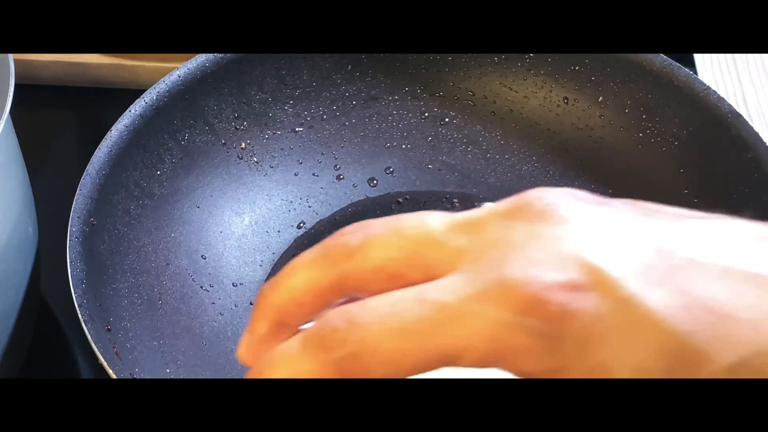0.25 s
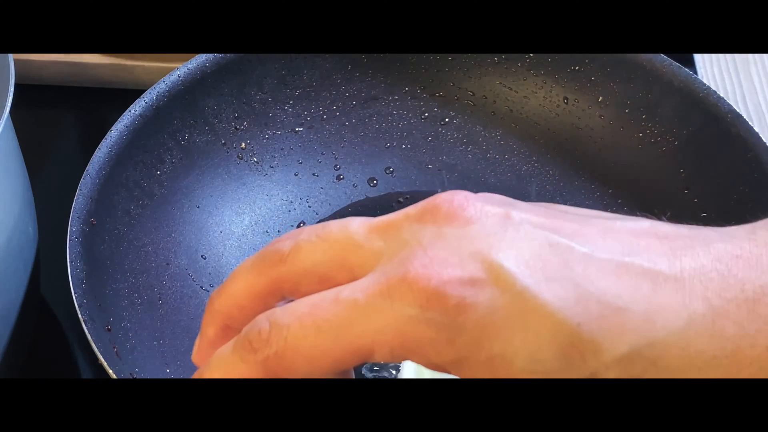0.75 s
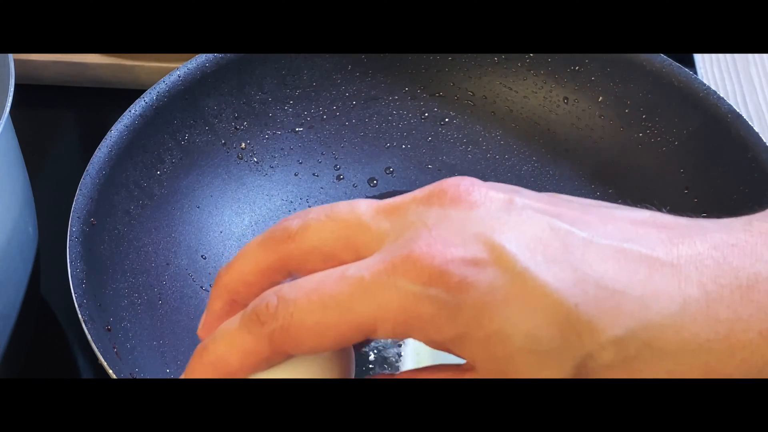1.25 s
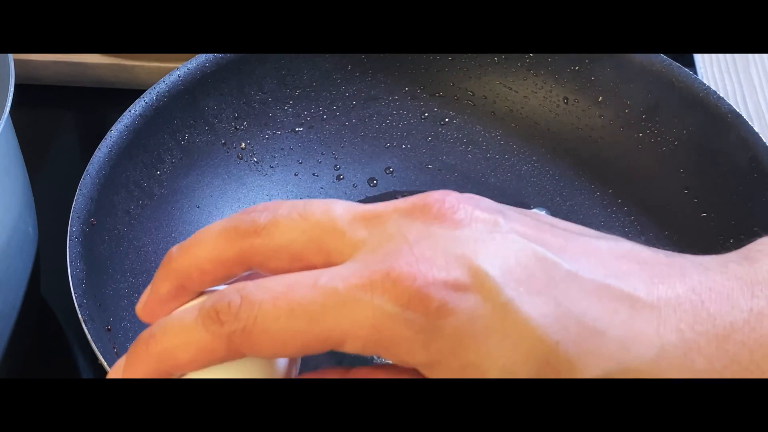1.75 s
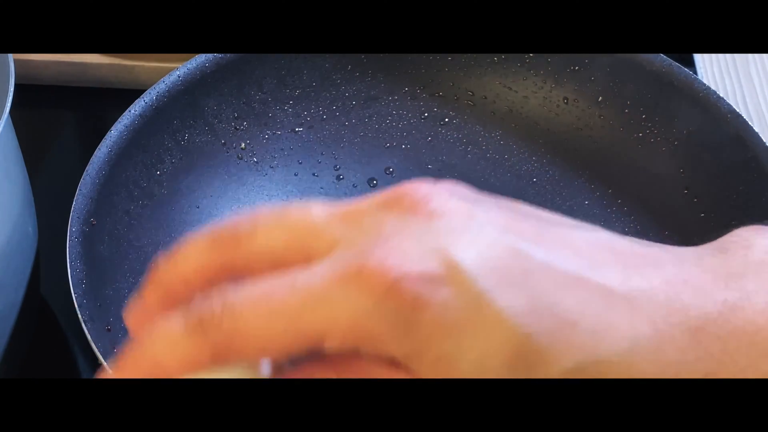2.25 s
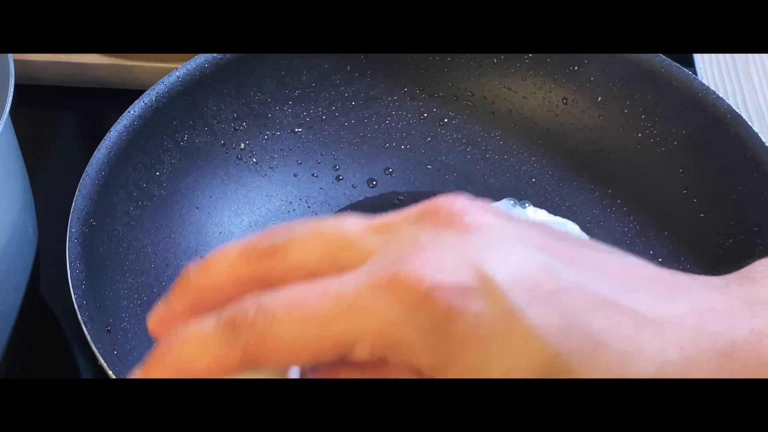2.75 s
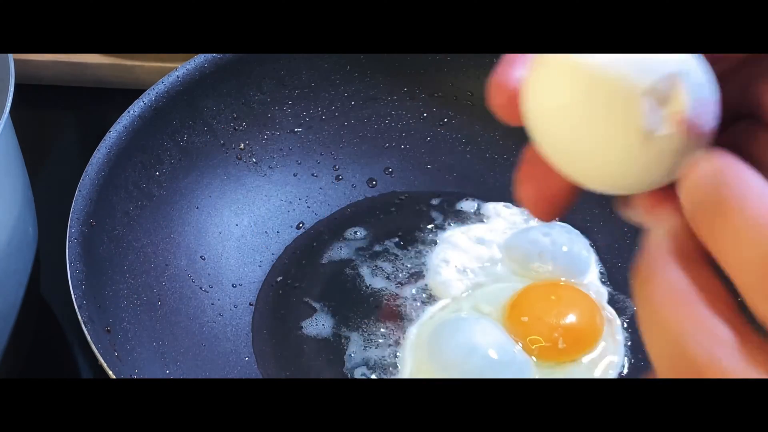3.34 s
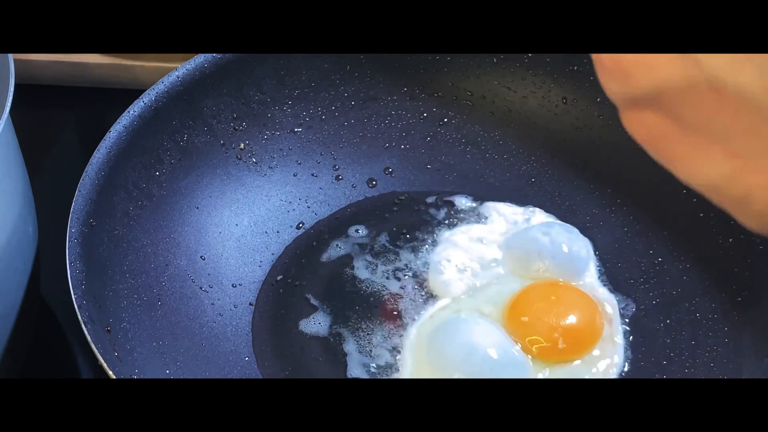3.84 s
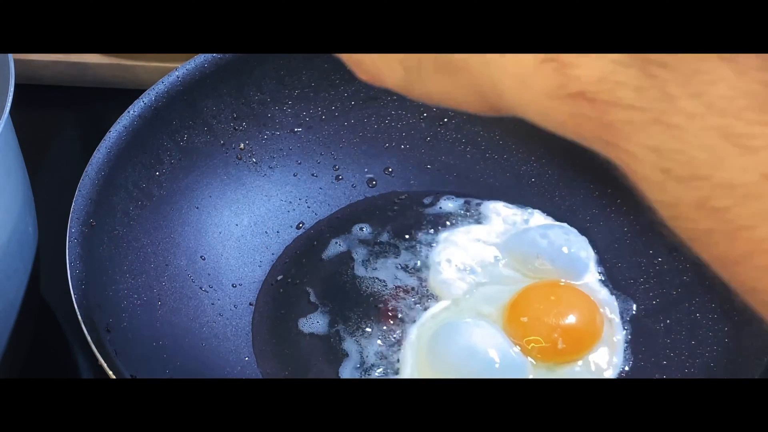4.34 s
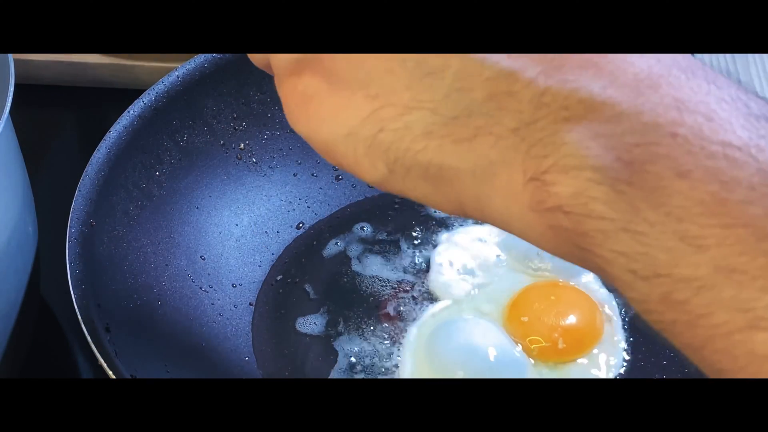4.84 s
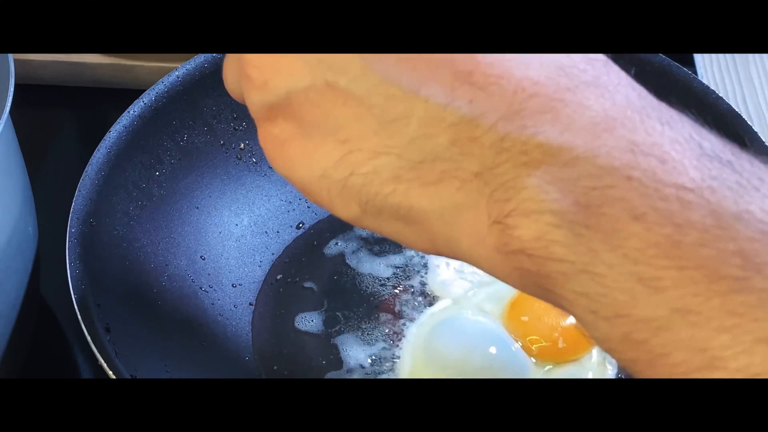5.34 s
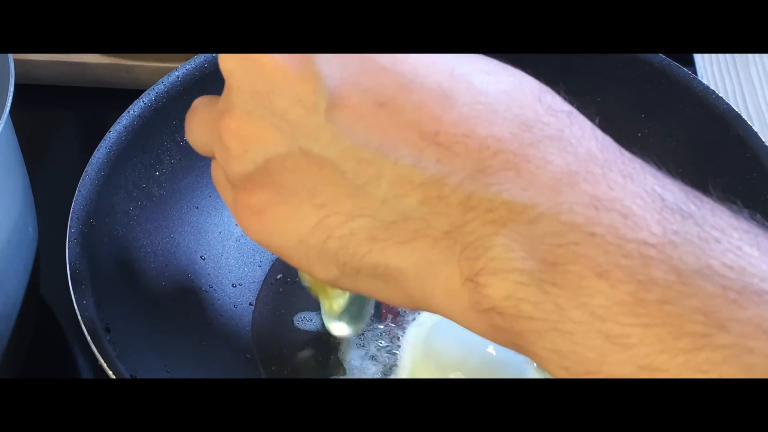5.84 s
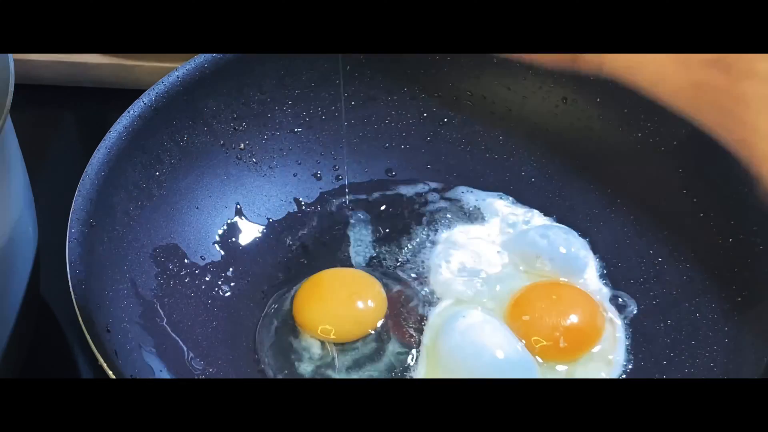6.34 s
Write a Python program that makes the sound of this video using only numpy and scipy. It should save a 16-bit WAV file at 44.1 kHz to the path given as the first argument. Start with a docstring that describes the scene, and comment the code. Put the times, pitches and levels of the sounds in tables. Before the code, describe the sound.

An egg fries in a pan of hot oil, hissing steadily with fine crackle, sharp spits and small pitched pops. About two seconds in, a second egg is knocked four times on the metal rim: a dull hollow tock first, then clearer shell cracks. Frying continues, with stronger spitting bursts near five seconds and again at six. Close stereo microphone, small kitchen, faint low rumble.

```python
"""Oil hisses and crackles at once under an egg frying close by; water drops spit and steam bubbles plop.
Then a second egg is knocked four times on the pan's rim: each blow is a hollow tock, a ringing pan and a shell crack.
The hiss is modulated noise, crackles and bubbles are random grains, and spits are shaped jets of noise.
Pitched pops, the plops and the whistling notes in spits, are damped resonances; knocks excite the pan's modes.
The pan's hollow colours small ticks; a small kitchen adds a diffuse answer and a low rumble."""
import sys
import numpy as np
from scipy import signal
from scipy.fft import rfft, irfft, next_fast_len
from scipy.io import wavfile
from scipy.ndimage import uniform_filter1d, map_coordinates

SR = 44100
rng = np.random.default_rng(int(sys.argv[2]) if len(sys.argv) > 2 else 0)


def generate_wav(sig):
    """Save sig (samples, or channels by samples) to the path in sys.argv[1] as 16-bit PCM at SR."""
    pcm = np.round(np.clip(np.atleast_2d(sig).T, -1, 1) * 32767).astype(np.int16)
    wavfile.write(sys.argv[1], SR, pcm)


N = 290178  # samples
TOP_HZ = 15850  # upper limit of the grains' pitches and of the whole sound

# The kitchen's low rumble. Each row: frequency in Hz, relative level in dB per Hz.
RUMBLE_SPECTRUM = [(25, -50), (45, -9), (75, -1), (130, 0), (200, -14), (350, -17), (800, -29),
                   (4000, -47.5)]
# Decay of the kitchen's answer. Each row: frequency in Hz, time to fall 60 dB in seconds.
ROOM_DECAY = [(100, 0.4335), (1000, 0.28024), (5000, 0.2448), (15000, 0.2097)]
# Stereo width. Each row: frequency in Hz, gain of the side signal in dB.
SIDE_GAIN = [(80, -18), (200, -12), (450, -.5), (1300, 1.5), (2400, -5.5), (5000, -27), (15000, -12)]
# Stereo balance. Each row: frequency in Hz, left minus right in dB.
LEFT_RIGHT_BALANCE = [(100, 0), (200, 3), (380, -4.5), (520, -2), (700, 6.5), (1290, 2.5), (2400, -0.1569),
                      (5000, 0)]

# How hard the oil fries. Each row: time in seconds, reference level in dB.
FRYING_LEVEL = [(0.0, -47), (0.22, -48.5), (0.53, -46), (1.1, -49), (1.83, -48), (2.02, -46.5),
                (2.6, -49.5), (2.77, -52), (3.24, -51), (4.1, -50), (4.49, -52.5), (4.8, -49.5),
                (4.95, -48), (5.66, -51.5), (6.07, -48), (6.58, -50.5)]
# Hiss of the oil. Each row: frequency in Hz, relative level in dB per Hz.
HISS_SPECTRUM = [(100, -20), (400, -9.5), (1200, -6.5), (2100, -1), (3200, -1.0925), (4100, 1.5), (5200, 1),
                 (7500, -1.5), (11000, -1), (13000, -3.5), (16000, -7)]
# Simmer under the egg. Each row: frequency in Hz, relative level in dB per Hz.
SIMMER_SPECTRUM = [(100, -20), (240, -5.5), (330, -15), (410, -5.5), (475, 5.5), (560, -3.5), (680, -1),
                   (870, -8.5), (1150, 2), (1450, -7.5), (3000, -24.5), (8000, -48)]
# Air modes of the pan's hollow. Each row: frequency in Hz, bandwidth in Hz, gain in dB.
HOLLOW_MODES = [(481.03, 53.92, -0.5), (671.9, 222, -10), (1145, 87.23, -1), (1884.5, 381.6, -5.5)]
CLUSTER_COUNT, CLUSTER_S = 4, .03  # droplets set each other off: number in a cluster, and over how long
SIMMER_DB, SETTING_DB_PER_S = -3, 0.2346  # simmer against the frying; it weakens as the white sets
# Steam seeping from under the white starts quickly, then runs out.
SEEP_START_S, SEEP_ATTACK_S, SEEP_DB, SEEP_FADE_DB_PER_S = .13, .04, -51, 3.5

SCATTER_DB, LENGTH_SCATTER = 2.5, 0.4298  # small drops and bubbles: +- level, and +- natural log of length

# The loudest pitched pops: plops of bubbles, and whistling notes within the spits.
# Each row: time in seconds, level in dB, pitch in Hz, time to fall 60 dB in seconds.
LOUD_POPS = [(0.168, -36, 840, .07), (0.2, -44, 480, .08), (0.335, -43, 470, .13), (0.366, -38, 1800, .06),
             (0.392, -39, 1600, .05), (0.445, -39, 2050, .07), (0.483, -41, 480, .06),
             (0.523, -26, 4100, .02), (0.605, -35, 1800, .09), (0.608, -39, 900, .06),
             (0.708, -37, 1600, .02), (0.757, -40, 480, .054), (0.795, -34.5, 2150, .1),
             (0.825, -40, 1150, .05), (0.845, -37, 1800, .012), (1.116, -37, 468, .115),
             (1.213, -40, 518, .088), (1.239, -32, 4100, .03), (1.245, -38, 1800, .04),
             (1.307, -31.5, 1850, .018), (1.341, -33, 3900, .02), (1.373, -36, 3300, .015),
             (1.476, -38, 2500, .03), (1.518, -32, 2036, .07), (1.595, -39, 1700, .03),
             (1.637, -31.5, 1700, .035), (1.758, -34.5, 1600, .045), (1.762, -29, 4800, .025),
             (1.845, -35, 2000, .09), (1.963, -38, 1800, .03), (2.038, -35, 3800, .025),
             (2.107, -35, 1700, .075), (2.297, -35, 1155, .038), (2.625, -31.5, 2300, .03),
             (2.67, -37, 2117, .1), (2.81, -39, 1150, .025), (3.002, -33, 2714, .045),
             (3.251, -38, 2200, .04), (3.42, -39, 470, .06), (3.469, -33, 1150, .02),
             (3.476, -26, 4000, .03), (3.535, -41, 1500, .05), (3.581, -33, 2200, .025),
             (3.717, -37, 470, .039), (3.798, -30, 494, .04), (3.843, -35, 1099, .055),
             (3.905, -38, 4300, .03), (3.938, -41, 520, .04), (4.217, -40, 1250, .025),
             (4.402, -39, 1300, .012), (4.7, -38, 900, .035), (5.05, -29, 2280, .008),
             (5.09, -33, 2772, .044), (5.126, -22, 1650, .04), (5.152, -33, 2200, .08),
             (5.171, -39, 480, .035), (5.258, -35, 4000, .015), (5.296, -27.5, 2143, .015),
             (5.371, -33, 1905, .03), (5.398, -39, 1500, .04), (5.68, -37, 2400, .015),
             (5.695, -33, 2006, .018), (5.712, -37, 2000, .03), (5.972, -28, 1900, .03),
             (5.997, -33, 2000, .03), (6.024, -24, 2200, .034), (6.05, -40, 1130, .08),
             (6.1, -33.5, 468, .037), (6.485, -31.5, 2353, .023), (6.565, -26, 3100, .035)]
SMALL_PLOPS_PER_S, SMALL_PLOP_DB, SMALL_PLOP_S = 2, -51, .025  # rate, central level, central decay
LOW_PLOP_HZ, HIGH_PLOP_HZ = 445.04, 2570.9
RING_CYCLES = 45  # a pop's own note dies 60 dB within this many cycles
RING_DB, SPATTER_DB = -4.5, -8.5  # that note, and the oil thrown up, against the fluttering steam

# The loudest water drops bursting in the oil.
# Each row: peak in seconds, level in dB before the common lift, time to rise 60 dB in seconds,
# time to fall 60 dB in seconds, treble tint in dB.
LOUD_DROPS = [(0.0159, -19, .016, .042, 7), (0.0666, -27, .01, .06, 6), (0.168, -35, .05, .03, 3),
              (0.274, -33, .002, .015, -8), (0.3215, -27, .01, .038, -8), (0.457, -31, .004, .03, -6),
              (0.5223, -22, .006, .026, 6), (0.6287, -16, .004, .012, -3), (0.6314, -17, .003, .028, -2),
              (0.645, -30, .02, .08, -6), (0.901, -31, .004, .02, 0), (0.9137, -27, .035, .07, -9),
              (1.048, -36, .005, .03, -6), (1.2283, -27, .002, .009, -13), (1.2369, -33, .004, .033, -3),
              (1.433, -36, .02, .04, -3), (1.5298, -35, .07, .06, 2), (1.919, -34, .03, .05, -8),
              (2.3777, -28, .02, .049, 4), (2.495, -32, .015, .03, 2), (2.5163, -29, .003, .036, -1),
              (2.5441, -28, .024, .055, -1), (2.7587, -33, .025, .025, 3), (3.0588, -32, .003, .022, 3),
              (3.4695, -23, .008, .025, -6), (3.477, -26, .003, .022, -5), (3.5805, -27, .006, .038, 7),
              (3.882, -34, .002, .012, -10), (4.039, -31, .002, .012, 3), (4.0699, -32, .002, .036, 4),
              (4.0966, -30, .036, .031, 5), (4.152, -19, .036, .052, 4), (4.358, -33, .002, .012, -8),
              (4.5947, -16, .013, .029, 5), (4.7416, -31, .006, .08, 1), (4.814, -26, .088, .11, 1),
              (4.8255, -16, .011, .042, 2), (4.9228, -28, .003, .022, -2), (5.07, -20, .004, .01, 6),
              (5.0888, -26, .005, .016, -1), (5.0947, -21.5, .008, .026, 5), (5.2335, -30, .005, .027, 3),
              (5.363, -31, .002, .008, 2), (5.6631, -30, .003, .013, -1), (5.71, -28, .01, .05, 0),
              (5.738, -34, .04, .07, -2), (5.786, -35, .004, .025, -6), (5.9705, -21, .024, .041, 2),
              (6.1203, -34, .02, .06, -3), (6.14, -32, .003, .015, -3), (6.29, -34, .002, .012, -5),
              (6.4652, -25, .002, .008, 3), (6.5639, -18.5, .016, .036, 0)]
DROP_LIFT_DB = 1.4742  # common lift of all drops, large and small
# Colour of every jet. Each row: frequency in Hz, relative level in dB per Hz.
JET_SPECTRUM = [(30, -28.5), (110, 5.5), (200, -2.5), (350, -4.5), (500, 0.5), (1700, 3.5), (3100, -3.5),
                (4100, 0.5), (5200, 0), (8000, -.5), (11000, 0.5), (13000, -4), (16000, -5.5)]
SPIT_BODY_DB = -7  # tint of the drops' low mids
SMALL_SPITS_PER_S, SMALL_SPIT_DB, SMALL_SPIT_S = 2.6, -41, 0.013  # rate, central level before lift, fall
SMALL_SPIT_RISE_S, SMALL_SPIT_TREBLE_DB = .004, 11  # they burst at once; treble tint of the brightest
SPRAY_PER_S, SPRAY_DB = 700, -11  # droplets clicking around every jet: rate, level against it

# The egg on the rim. Each row: time in seconds, the pan's thump in dB, boom in dB, body in dB, ring in dB,
# contact cut-off in Hz, the egg's tock in dB, tock pitch in Hz, tock's time to fall 60 dB in seconds,
# shell crack in dB.
EGG_KNOCKS = [(1.869, -24.5, -28.5, -20.5, -28.5, 1020, -13.5, 685, .028, -38),
              (2.1735, -25.5, -39, -35, -30, 3000, -14.5, 780, .011, -14.5),
              (2.453, -22.5, -39, -45, -37, 3000, -18, 700, .012, -24),
              (2.679, -26, -26.5, -39, -44, 3000, -30, 900, .011, -22)]
# Modes of the pan on its hob. Each row: frequency in Hz, relative level in dB, time to fall 60 dB in seconds.
PAN_MODES = [(48.3, -18, .35), (80.2, -6.5, .42), (104, -16, .18), (138, -1, .31), (225, -3, .25),
             (256, -4, .15), (301, -3.5, .21), (386, -3, .2), (468, -3, .17), (587, -10, .22),
             (686, -4.5, .27), (883, -10, .24), (964, -7, .22), (1087, -4, .17), (1152, -4, .26),
             (1696, -6, .23), (1860, 0, .1), (1943, -1, .23), (2552, -9, .2), (2740, -8, .2)]
# Thud of the blow. Each row: frequency in Hz, relative level in dB per Hz.
THUD_SPECTRUM = [(30, -34), (110, -2), (250, -1), (420, -2.5), (680, 1), (1100, -1.5), (1700, -12.5),
                 (5000, -48)]
CRUNCH_DB = -15  # bits of shell grind on after each blow, against its crack
# The pressing egg stiffens the low modes: initial share of pitch, and time constant of its release.
PRESS_SHARP, PRESS_S = .09, .022


def amp(db):
    """Decibels are a logarithmic measure of gain."""
    return 10 ** (np.asarray(db) / 20)


def unit(x):
    """Normalisation to an rms value of 1."""
    return x / np.sqrt(np.mean(x ** 2) + 1e-20)


def along(points, hz):
    """Interpolation of (Hz, value) points on a logarithmic frequency axis."""
    f, v = np.transpose(points)
    return np.interp(np.log(hz + 1), np.log(f + 1), v)


def wobble(rate):
    """Slow random modulation: a smooth curve through rate random knots a second."""
    knots = rng.standard_normal(int(N * rate / SR) + 4)
    return map_coordinates(knots, [np.arange(N) * rate / SR])


def filtered(x, response):
    """Linear filtering: the spectrum is multiplied by a complex response of frequency."""
    n = x.shape[-1]
    m = next_fast_len(n + 4096)
    return irfft(rfft(x, m) * response(np.fft.rfftfreq(m, 1 / SR)), m)[..., :n]


def coloured(x, spectrum):
    """Spectral shaping of x by the given levels, normalised to rms 1."""
    return unit(filtered(x, lambda hz: amp(along(spectrum, hz))))


def resonance(hz, centre, width):
    """Frequency response of one damped mode."""
    return 1j * hz * width / (centre ** 2 - hz ** 2 + 1j * hz * width)


def hollow(x):
    """Cavity resonance: the air modes of the pan's hollow colour x, at rms 1."""
    return unit(filtered(x, lambda hz: sum(amp(db) * resonance(hz, f, w) for f, w, db in HOLLOW_MODES)))


def add(track, s, sound):
    """Superposition: a sound is added to the track from time s."""
    start = round(s * SR)
    part = sound[max(-start, 0):max(N - start, 0)]
    track[max(start, 0):][:len(part)] += part


def clicks(rate, count):
    """Random impulses of random size, about rate a second over count samples, at rms 1."""
    chance, size = rng.random(count), rng.standard_normal(count)
    return unit(size * (chance < rate / SR))


def small_events(rate, db, length):
    """Random events (s, level dB, length s, rank 0-1), scattered about one level and length."""
    when, size, life, rank = rng.random((int(rate * N / SR), 4)).T
    levels = db + SCATTER_DB * (2 * size - 1)
    lengths = length * np.exp(LENGTH_SCATTER * (2 * life - 1))
    return zip(when * N / SR, levels, lengths, rank)


def rumble():
    """Low-frequency room noise: coloured noise whose level drifts slowly."""
    return amp(-60.0 + 2.512 * wobble(5.6)) * coloured(rng.standard_normal((2, N)), RUMBLE_SPECTRUM)


def room(x):
    """Diffuse reverberation: the kitchen's answer is decaying noise, independent in each channel."""
    hz, t, z = signal.stft(rng.standard_normal((2, SR // 2)), SR, nperseg=256)
    decay = amp(-60 * t / along(ROOM_DECAY, hz)[:, None])
    tail = signal.istft(z * decay, SR, nperseg=256)[1]
    delayed = np.pad(x, (SR // 300, 0))[None]
    return signal.fftconvolve(delayed, tail / np.linalg.norm(tail[0]), axes=1)[:, :N]


def walls(x, echo_db, count):
    """Early reflection: the pan's sloping walls and the hob send back a few delayed copies."""
    delays, signs = rng.uniform(0.00041114, .006, count), rng.choice([-1, 1], count)
    echoes = lambda hz: 1 + amp(echo_db) * signs @ np.exp(-2j * np.pi * delays[:, None] * hz)
    return filtered(x, echoes) / np.sqrt(1 + count * amp(echo_db) ** 2)


def grains(rate, pitch_hz, spread, cycles, size_db, count):
    """Bubble oscillation: damped sines at random times, count samples long, a few much larger than the rest."""
    when, pitch, size = rng.random((int(rate * N / SR), 3)).T
    hz = np.clip(pitch_hz * (pitch / (1 - pitch)) ** spread, 450, TOP_HZ)[:, None]
    gain = amp(-size_db * np.log(np.maximum(size, .015)))[:, None]
    turns = hz * np.arange(count) / SR
    waves = gain * np.sin(2 * np.pi * turns) * np.exp(-turns / cycles)
    index = (when * N).astype(int)[:, None] + np.arange(count)
    return unit(np.bincount(index.ravel(), waves.ravel(), N)[:N])


def crackle(rate, pitch_hz, spread, fall, size_db):
    """Clustered bursting: small droplets fizz off in brief noises, each around its own pitch."""
    t = np.arange(SR // 40) / SR
    when, pitch, size, life, lag = rng.random((int(rate * N / SR), 5)).T[:, :, None]
    order = np.arange(len(when))
    # droplets of one cluster share its start
    start = when[order - order % CLUSTER_COUNT] * N + lag * CLUSTER_S * SR
    centre = np.clip(pitch_hz * (pitch / (1 - pitch)) ** spread, 900, TOP_HZ)
    hz = np.fft.rfftfreq(len(t), 1 / SR)
    noise = rfft(rng.standard_normal((len(when), len(t))))
    fizz = irfft(noise * resonance(hz, centre, 0.6092 * centre) ** 2, len(t))
    t60 = fall * (0.261 + 1.4446 * life)
    swell = (1 - np.exp(-t / 0.0003026)) * amp(-60 * t / t60)
    gain = amp(-size_db * np.log(np.maximum(size, .04))) / np.sqrt(centre)
    index = start.astype(int) + np.arange(len(t))
    return unit(np.bincount(index.ravel(), (gain * swell * fizz).ravel(), N)[:N])


def seep(time):
    """Resonant flow noise: steam seeping from under the white sounds near 800 Hz and fades."""
    response = lambda hz: resonance(hz, 790, 300) ** 2 + 1.3 * resonance(hz, 835, 45)
    steam = unit(filtered(rng.standard_normal(N), response))
    age = time - SEEP_START_S
    level_db = SEEP_DB - SEEP_FADE_DB_PER_S * age + 2.544 * wobble(25.131)
    return np.clip(age / SEEP_ATTACK_S, 0, 1) * amp(level_db) * steam


def simmer(level_db):
    """Larger bubbles under the egg: low coloured noise, and ticks resonating in the pan's hollow."""
    ticks = grains(rate=380, pitch_hz=1200, spread=0.27, cycles=0.85, size_db=4, count=300)
    noise = coloured(rng.standard_normal((2, N)), SIMMER_SPECTRUM)
    return amp(level_db) * (amp(-.3) * noise + amp(-1.5) * hollow(ticks))


def sizzle():
    """Superposed micro-bubbles: the oil hisses and crackles, with the simmer and seeping steam."""
    time = np.arange(N) / SR
    heat_db = np.interp(time, *np.transpose(FRYING_LEVEL))
    hiss = coloured(rng.standard_normal(N), HISS_SPECTRUM) * amp(1.611 * wobble(35) + 0.669 * wobble(220))
    sparks = crackle(rate=400, pitch_hz=7200, spread=0.38, fall=0.015, size_db=5.8)
    blips = crackle(rate=220, pitch_hz=2250, spread=.26, fall=.021, size_db=5.0)
    bubbles = grains(rate=300, pitch_hz=3007.6, spread=0.34708, cycles=3.358, size_db=5.5, count=400)
    oil = amp(heat_db) * (amp(-2.2) * hiss + amp(-2.7) * sparks + amp(-5.6) * blips + amp(-8.5) * bubbles)
    return oil + simmer(heat_db + SIMMER_DB - SETTING_DB_PER_S * time) + seep(time)


def snaps():
    """Film rupture: lone oil films snap as low dry ticks that ring the pan's hollow, and bright pinpricks."""
    low = grains(rate=11, pitch_hz=1500, spread=.22, cycles=.9, size_db=3, count=300)
    high = grains(rate=12, pitch_hz=9500, spread=.22, cycles=1.6, size_db=3.5, count=100)
    return walls(amp(-60) * low + amp(-65) * hollow(low) + amp(-58) * high, echo_db=-10, count=6)


def pitched_pops():
    """Damped resonance: plops and whistling notes ring, flutter around their pitch, and spatter."""
    track, t = np.zeros(N), np.arange(-SR // 20, SR // 8) / SR
    small = [(s, db, LOW_PLOP_HZ * (HIGH_PLOP_HZ / LOW_PLOP_HZ) ** rank, t60)
             for s, db, t60, rank in small_events(SMALL_PLOPS_PER_S, SMALL_PLOP_DB, SMALL_PLOP_S)]
    envelope = lambda t60: amp(-60 * np.maximum(-t / (0.36 * t60), t / t60))
    for s, db, pitch_hz, t60 in LOUD_POPS + small:
        swell = envelope(t60)
        width = .22 * pitch_hz * np.sqrt(pitch_hz / 2000)
        cavity = lambda hz: resonance(hz, pitch_hz, width) * resonance(hz, pitch_hz, 1.1 * pitch_hz)
        flutter = unit(filtered(swell * rng.standard_normal(len(t)), cavity))
        ring = unit(envelope(min(t60, RING_CYCLES / pitch_hz)) * np.sin(2 * np.pi * pitch_hz * t))
        droplets = envelope(1.7 * t60) * clicks(rate=1500, count=len(t))
        spatter = unit(filtered(droplets, lambda hz: resonance(hz, 2200, 3200) ** 2))
        pop = unit(flutter + amp(RING_DB) * ring + amp(SPATTER_DB) * spatter)
        # begins half a cycle early
        add(track, s + t[0] - .5 / pitch_hz, amp(db) * pop * np.sqrt(np.mean(swell ** 2)))
    return track


def burst(t, rise, fall, treble_db, body_db, ragged_db):
    """Jet noise: a ragged flow peaks near t = 0 in a spray of clicks, whistling at three random pitches."""
    tint = [(1600, body_db), (3200, 0), (6000, 0), (9500, treble_db)]
    whistle_hz = 4300 * np.exp(.4 * rng.standard_normal(size=(3, 1)))
    whistles = lambda hz: 1 + 1.1 * resonance(hz, whistle_hz, .05 * whistle_hz).sum(0)
    colour = lambda hz: amp(along(JET_SPECTRUM, hz) + along(tint, hz)) * whistles(hz)
    jet = unit(filtered(rng.standard_normal(len(t)), colour))
    spray = unit(filtered(clicks(SPRAY_PER_S, len(t)), colour))
    sputter = amp(ragged_db * unit(uniform_filter1d(rng.standard_normal(len(t)), size=50)))
    swell = amp(-60 * np.maximum(-t / rise, t / fall))
    # the opening limits the flow, which rounds off the peak; the spray outlasts the jet
    flow = np.tanh(swell)
    spray_swell = swell ** np.where(t < 0, 2, .65)
    sound = jet * sputter * flow + amp(SPRAY_DB) * spray * spray_swell
    return unit(sound) * np.sqrt(np.mean(swell ** 2))


def spits():
    """Flash boiling: a water drop turns to steam, and its jet swells, bursts and dies away."""
    track, t = np.zeros(N), np.arange(-SR // 10, SR // 6) / SR
    small = [(s, db, SMALL_SPIT_RISE_S, fall, SMALL_SPIT_TREBLE_DB * rank)
             for s, db, fall, rank in small_events(SMALL_SPITS_PER_S, SMALL_SPIT_DB, SMALL_SPIT_S)]
    for s, db, rise, fall, treble_db in LOUD_DROPS + small:
        jet = burst(t, rise, fall, treble_db, SPIT_BODY_DB, ragged_db=2.6)
        add(track, s + t[0], amp(db + DROP_LIFT_DB) * jet)
    return track


def knocks():
    """Impact excitation: the egg's hollow tock rings the pan's modes; the shell cracks and goes on crunching."""
    track, t = np.zeros(N), np.arange(SR // 2) / SR
    hz, mode_db, t60 = np.transpose(PAN_MODES)[:, :, None]
    for (s, thump_db, boom_db, body_db, ring_db, cutoff_hz,
         tock_db, tock_hz, tock_s, crack_db) in EGG_KNOCKS:
        bands = [(165, thump_db), (210, boom_db), (260, boom_db), (290, body_db), (410, body_db), (490, ring_db)]
        # a soft contact hardly excites the high modes
        force = lambda f: amp(along(bands, f)) / np.sqrt(1 + (f / cutoff_hz) ** 4)
        strength = force(hz) * amp(mode_db + rng.normal(0, 1, hz.shape) - 60 * t / t60)
        # heavy low modes take about a cycle to get going
        onset = 1 - np.exp(-(t * hz / .8) ** 2)
        # phase advance in turns while the egg presses
        sink = PRESS_SHARP * np.minimum(hz, 250) * PRESS_S * (1 - np.exp(-t / PRESS_S))
        # the pan rocks on its supports, so each mode wavers a little
        waver = .065 * map_coordinates(rng.standard_normal(4096), [40 * t + rng.uniform(0, 4000, hz.shape)])
        swing = onset * np.sin(2 * np.pi * (hz * t + sink + waver))
        thud_noise = filtered(rng.standard_normal(len(t)), lambda f: amp(along(THUD_SPECTRUM, f)) * force(f))
        thud = thud_noise * amp(8.5 - 60 * t / .135)
        # the egg sounds while it touches the rim, then the hand damps it: a tone with a rasp
        rasp = unit(filtered(rng.standard_normal(len(t)), lambda f: resonance(f, tock_hz, .6 * tock_hz) ** 2))
        tone = np.sin(2 * np.pi * tock_hz * t)
        tock = (tone + amp(-8) * rasp) * amp(tock_db - 60 * (t / tock_s) ** 2)
        blow = (thud + tock) * (1 - np.exp(-(t * tock_hz / .7) ** 2))
        shell = burst(t - .0015, rise=.004, fall=.036, treble_db=-5, body_db=1, ragged_db=1.5)
        crunch = burst(t - .012, rise=.02, fall=.11, treble_db=-8, body_db=2, ragged_db=5)
        crack = amp(crack_db) * (shell + amp(CRUNCH_DB) * crunch)
        add(track, s, np.sum(strength * swing, 0) + blow + crack)
    return track


def scene():
    """Superposition of the close direct sounds, their reflections and the room's rumble."""
    spit, pop, knock = spits(), pitched_pops(), knocks()
    answer = room(amp(-10) * spit + amp(-7.5) * pop + amp(-8) * knock)
    frying = walls(sizzle() + spit, echo_db=-25.5, count=7)
    return rumble() + answer + frying + snaps() + pop + knock


def record(dry):
    """Mid-side stereo: width and balance vary with pitch, and the left treble lags behind the right."""
    sign = np.array([[1], [-1]])  # left, right
    side = filtered((dry[0] - dry[1]) / 2, lambda hz: amp(along(SIDE_GAIN, hz)))
    pair = dry.mean(0) + sign * side
    # above 7050 Hz the left lags by one more turn every 4170 Hz
    lag = lambda hz: 2 * np.pi * np.maximum(hz - 7050, 0) / 4170
    balance = lambda hz: amp(sign * along(LEFT_RIGHT_BALANCE, hz) / 2)
    pair = filtered(pair, lambda hz: balance(hz) * np.exp(-1j * (sign > 0) * lag(hz)))
    return filtered(pair, lambda hz: hz < TOP_HZ)


dry = scene()
out = record(dry)
generate_wav(out)
```